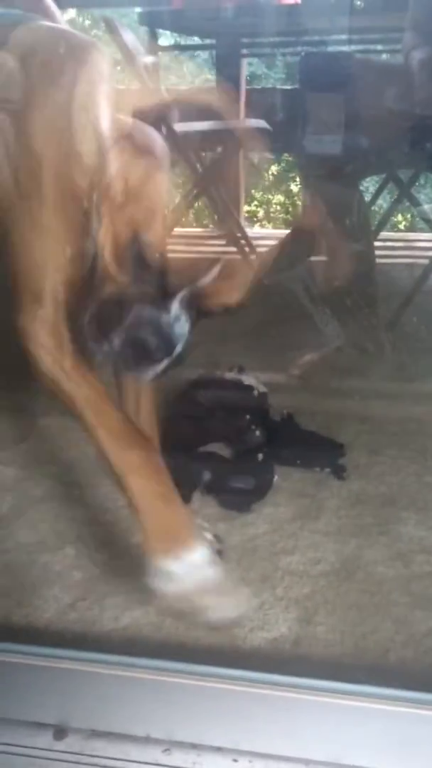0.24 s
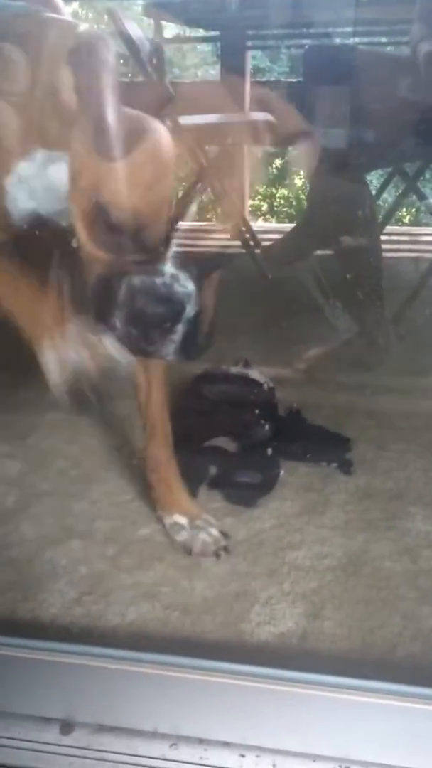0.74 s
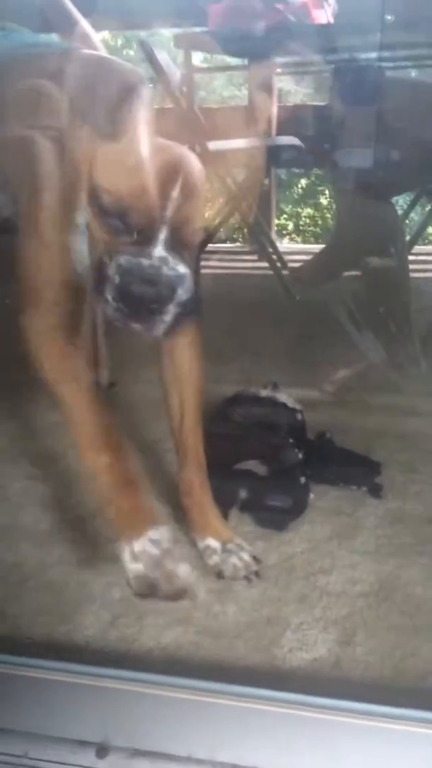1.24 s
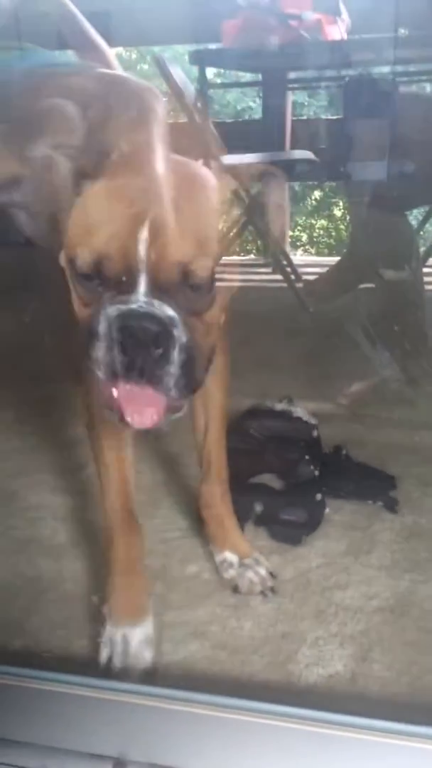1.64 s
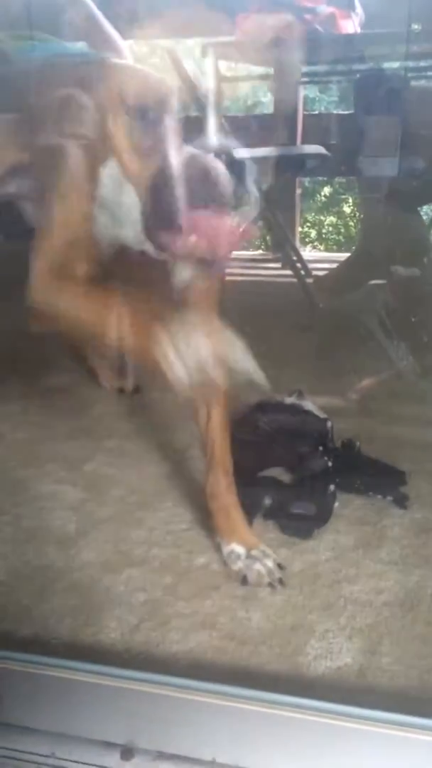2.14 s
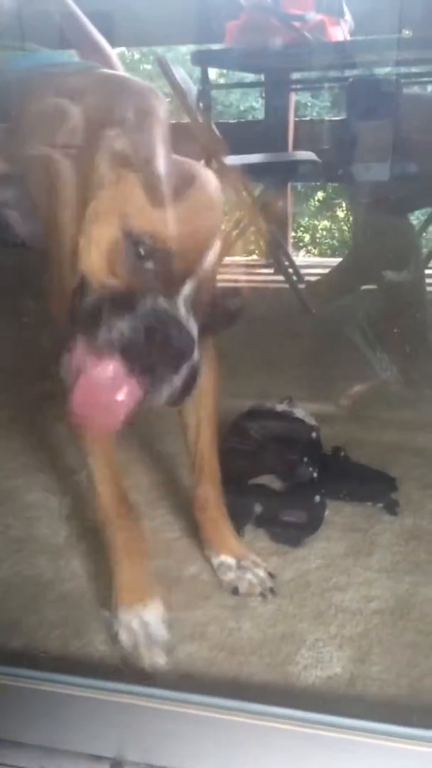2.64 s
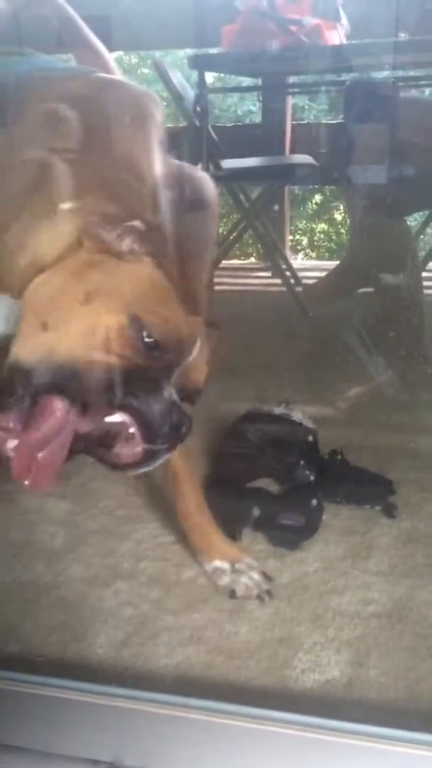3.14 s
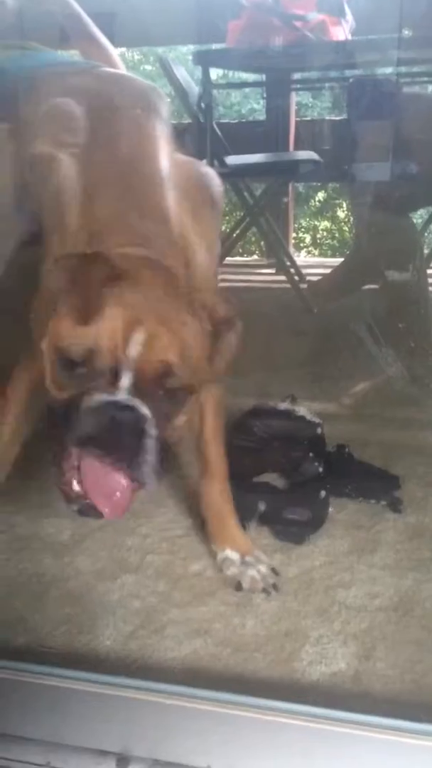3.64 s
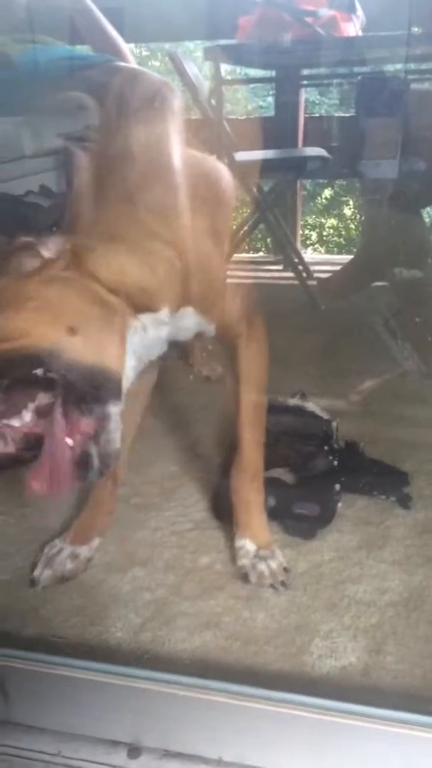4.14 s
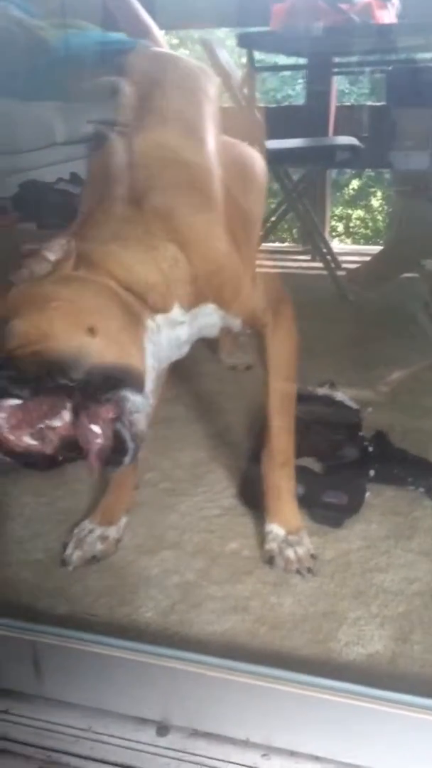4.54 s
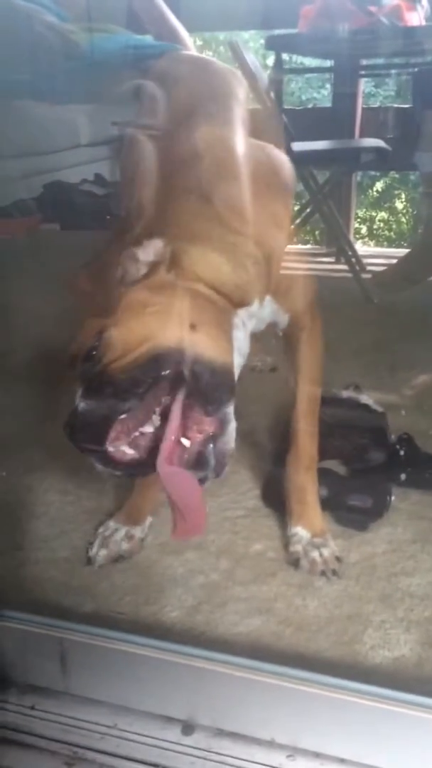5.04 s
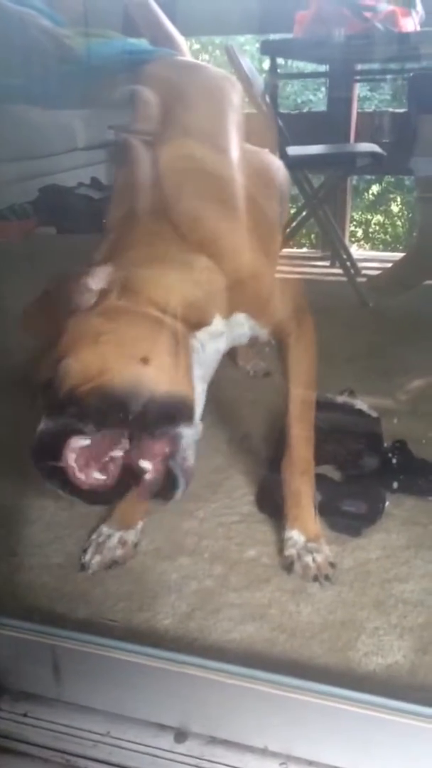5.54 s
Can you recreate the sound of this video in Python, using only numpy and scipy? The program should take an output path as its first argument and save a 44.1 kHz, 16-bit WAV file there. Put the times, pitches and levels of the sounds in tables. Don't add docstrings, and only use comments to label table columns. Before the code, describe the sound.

Heard close through a glass door, a dog's claws and teeth make scattered bright clicks and scrapy ticks, each answered by a brief glassy ring. Sharper cracks cluster around one and a half, two and two and a half seconds. Later, muzzle bumps dominate, giving low hollow thuds, the loudest near four and a half and five and a half seconds. A steady low ventilation rumble with faint hiss lies beneath, with a very short room tail.

```python
import sys
import numpy as np
from scipy import signal
from scipy.fft import rfft, irfft
from scipy.io import wavfile

SR = 44100
rng = np.random.default_rng(int(sys.argv[2]) if len(sys.argv) > 2 else 0)


def volts_from_db(level):
    exponent = np.asarray(level, float) / 20
    return 10 ** exponent


def dump(signal):
    limited = np.clip(np.atleast_2d(signal).T, -1, 1)
    pcm = np.round(limited * 32767).astype(np.int16)
    wavfile.write(sys.argv[1], SR, pcm)


N = 255769

# f/Hz, density/dB per Hz
AIR_COLOUR = [(12, -57), (20, -27.5), (32, -14), (70, -2), (193, -0.5), (255, -14.5), (285, -7.5),
              (377, -12.5), (641, -25.5), (872, -20.5), (1000, -26.5), (1150, -24.5), (7100, -47.5),
              (14700, -49.5), (16000, -78)]
# f/Hz, width/Hz, boost/dB
DUCT_PEAKS = [(208.2, 29, 5.5), (288, 12, 5.5), (645, 104, 14), (994, 37, 8.5), (6390, 2900, 8),
              (8440, 3100, 4)]
# f/Hz, level/dB, t60/s
DOOR_MODES = [(60, -28, 0.08), (101, -19, 0.39), (134.5, -32.5, 0.9), (219.4, -11, 0.19), (277.7, 2, 0.17),
              (340.5, -9.5, 0.28), (427, -9.5, 0.39), (481, -18, 0.35), (560, -11.5, 0.11),
              (632, -9.5, 0.13), (700.4, -3, 0.11), (806, -9.5, 0.095), (850, -25, 0.057), (952, -7, 0.046)]
# f/Hz, width/Hz, boost/dB
PANE_MODES = [(718, 69, -0.5), (890, 150, -17), (1430, 55, -15.5), (1700, 190, -10), (2050, 37, -2),
              (2200, 30, -7), (2435, 53, -5.5), (2440, 260, -7.5), (2970, 4.4, -11), (3900, 55, 1),
              (6300, 200, -40)]
# t/s, push/dB, ringing/dB, hardness/dB per octave above 350 Hz, struck spot f/Hz
BUMPS = [(0.087, -36.5, -26, -36, 205), (1.0221, -39.5, -2.5, -24, 290), (1.5158, -25.5, -27, 11, 444),
         (2.48, -36.5, -17, 4, 435), (2.697, -48, -10, 0, 200), (3.0665, -24.5, -15.5, -5.5, 298),
         (3.1584, -26, -12.5, -24, 286), (4.2562, -30, -9.5, -24, 296), (4.338, -30.5, -6, -23, 297),
         (4.4316, -12.5, -10.5, -1.5, 308.6), (4.6705, -37, -12.5, 2.5, 285), (5.2943, -24, -13, -24, 288),
         (5.4563, -13, -11.5, -2.5, 288), (5.507, -35.5, -2.5, -32, 440), (5.6512, -25.5, -16.5, -25, 288)]
# t/s, direct tick/dB, pane answer/dB, dullness/dB, struck spot f/Hz
STRIKES = [
    (-0.006, -70, -48, 3.5, 2714),
    (1.0169, -39, -29, 2.5, 920),
    (1.226, -41.5, -51.5, 0.5, 4000),
    (1.515, -25.5, -28.5, 0, 2945),
    (2.036, -22.5, -24, 5.5, 890),
    (2.0468, -26.5, -28.5, 10.5, 2377),
    (2.4787, -37, -38, 3.5, 1485),
    (3.0655, -39.5, -53, 5, 2435),
]
# t/s, direct tick/dB, pane answer/dB, dullness/dB, spot f/Hz
PINGS = [(0.2122, -34.5, -49.5, 4, 2230), (0.2915, -40, -35.5, -1, 2167), (0.5649, -31, -43, 0.3, 3900),
         (0.8821, -39, -48, 3, 2515), (1.345, -44.5, -52, 7.5, 1880), (1.5258, -11.5, -27, 2.5, 5220),
         (1.5472, -18, -37, -18, 6100), (2.246, -35, -41.5, 7, 1940), (2.4998, -15.5, -29, -9.5, 2560),
         (2.6033, -54, -59.5, -12, 2280), (5.5077, -64, -57.5, 13, 1590)]
# t/s, direct tick/dB, pane answer/dB, dullness/dB
GRAZES = [(0.0734, -58, -61.5, -5), (0.3184, -43, -50.5, 7), (0.4433, -58, -54, 11),
          (0.536, -47.5, -53.5, 6.5), (1.1415, -61, -56.5, 2), (1.157, -63, -62, -1.5),
          (2.2682, -45, -48, -3.5), (3.257, -53, -59.5, 19), (3.2837, -64, -54, 12),
          (4.392, -62, -47.5, 13), (4.429, -37.5, -45, 11.5)]
# t/s, direct tick/dB, pane answer/dB, dullness/dB
FLICKS = [(0.4818, -56, -67.5, -0.5), (0.7132, -62, -65.5, -0.5), (1.5225, -28, -54.5, 0.5),
          (2.1034, -47, -74, -8), (2.1065, -49.5, -69, -3.5), (2.3999, -57, -61.5, 1),
          (2.4915, -37.3, -63, 2), (3.1543, -53, -62, 4), (4.2515, -57, -80, -8), (4.9427, -67, -64.5, 2),
          (5.2925, -48.5, -70.5, 9), (5.4542, -49, -55, 10.5)]
# f/Hz, level/dB
DRAG_BANDS = [(1254, -43), (2150, -41.5), (2690, -45), (4020, -50), (5500, -56)]
DRAG_S, DRAG_LAG_S = 4.389, .008

RUMBLE_DB, HISS_DB = -51, -65.5
SHUDDER_DB, SHUDDER_T60_S = -29.5, 1.17
ROOM_T60_S, ROOM_DB = 0.16, -14
PUSH_MS, PUSH_MS_PER_DB, PUSH_MS_PER_HARD = 0.57, 0.01, -0.01
STRIKE_BODY_DB, PING_BODY_DB, GRAZE_BODY_DB, FLICK_BODY_DB, BODY_GROWS = 20, 21.5, 16.5, 0, 0.29
STRIKE_SPREAD_MS, PING_SPREAD_MS, GRAZE_SPREAD_MS, FLICK_SPREAD_MS = 7.6, 8, 9.7, 7.3
PANE_SPOT_DB, PANE_SPOT_DB_PER_OCTAVE, PANE_OVERTONE, PANE_OVERTONE_DB = -5, 2.5, 1.6, -8
OVERTONE_LOSS_DB = 23
PING_RING_DB = 4
DOOR_SPOT_DB, DOOR_OVERTONE, DOOR_OVERTONE_DB, DOOR_SPOT_LAG_S = -14.5, 1.47, -5, 0.00401
SPOT_T60_S, SPOT_T60_POWER, SPOT_RISE_MS, SPOT_RISE_POWER = 0.084, -0.41, 3.7, -0.63


def at_hz(points, hz):
    table_hz, values = np.transpose(points)
    return np.interp(np.log(hz + 1), np.log(table_hz), values)


def humps_db(peaks, hz):
    return sum(db / (1 + (2 * (hz - centre_hz) / width) ** 2) for centre_hz, width, db in peaks)


def rms_one(x):
    return x / np.sqrt(np.mean(x ** 2) + 1e-20)


def add(out, s, x):
    at = round(s * SR)
    x = x[max(-at, 0):N - at]
    out[max(at, 0):max(at, 0) + len(x)] += x


def drift(rate_hz):
    r = np.exp(-2 * np.pi * rate_hz * 40 / SR)
    slow = signal.lfilter([1], [1, -2 * r, r * r], rng.standard_normal(N // 40 + 2002))[2000:]
    return np.interp(np.arange(N) / 40, np.arange(len(slow)), rms_one(slow))


def shudder():
    t = np.arange(N) / SR
    power = np.zeros(N)
    for s, push_db, *_ in BUMPS:
        power += volts_from_db(push_db + SHUDDER_DB - 60 * np.abs(t - s) / SHUDDER_T60_S) ** 2 * (t > s)
    return power


def air():
    hz = np.arange(N // 2 + 1) * SR / N
    colour = volts_from_db(at_hz(AIR_COLOUR, hz) + humps_db(DUCT_PEAKS, hz))
    noise = irfft(rfft(rng.standard_normal((2, N))) * colour, N)
    rumble, hiss = np.zeros(N), np.zeros(N)
    edges = 16 * 2 ** np.arange(0, 10.4, .5)
    for k, (low_hz, high_hz) in enumerate(zip(edges, edges[1:])):
        band_pass = signal.butter(2, [low_hz, high_hz], "band", fs=SR, output="sos")
        band = volts_from_db(drift(11.5)) * signal.sosfilt(band_pass, noise[k % 2])
        if high_hz < 1200:
            rumble += band
        else:
            hiss += band
    rumble_level = np.sqrt(volts_from_db(RUMBLE_DB) ** 2 + shudder())
    return rumble_level * rms_one(rumble) + volts_from_db(HISS_DB) * rms_one(hiss)


def room(x):
    t = np.arange(SR // 2) / SR
    tail = rng.standard_normal(len(t)) * volts_from_db(-60 * t / ROOM_T60_S) * (t > .006)
    tail = signal.lfilter([1], [1, -.4], tail)
    return signal.fftconvolve(x, tail / np.sqrt(np.sum(tail ** 2)))[:N]


def bumps():
    out, t = np.zeros(N), np.arange(SR // 2) / SR
    scatter = rng.standard_normal((len(BUMPS), 2, len(DOOR_MODES)))
    hz, level_db, t60 = np.transpose(DOOR_MODES)[:, :, None]
    for (s, push_db, ring_db, hard_db, _), (strength, phase) in zip(BUMPS, scatter[..., None]):
        push_ms = PUSH_MS + PUSH_MS_PER_DB * (push_db + 25) + PUSH_MS_PER_HARD * hard_db
        u = (t[:900] * 1000 - 10) / push_ms
        lean = u / 3.34 + 0.52
        push = .68 * np.exp(-lean ** 2 / 2) - 1.17 * np.exp(-u ** 2 / 2)
        struck_db = level_db + 1.5 * strength + hard_db * np.maximum(np.log2(hz / 350), 0)
        modes = volts_from_db(struck_db - 60 * t / t60) * np.sin(2 * np.pi * hz * t + 2 * phase)
        rings = np.sum(modes, axis=0)
        rings = rings * (1 - np.exp(-(t / 0.0055) ** 2))
        add(out, s, volts_from_db(push_db + ring_db) * rings)
        add(out, s - .01, volts_from_db(push_db) * push)
    return out


def touches():
    kinds = [(STRIKES, STRIKE_BODY_DB, BODY_GROWS, STRIKE_SPREAD_MS),
             (PINGS, PING_BODY_DB, BODY_GROWS, PING_SPREAD_MS),
             (GRAZES, GRAZE_BODY_DB, 0, GRAZE_SPREAD_MS),
             (FLICKS, FLICK_BODY_DB, 0, FLICK_SPREAD_MS)]
    rows = []
    for table, body_db, grows, spread_ms in kinds:
        for s, tick_db, pane_db, dull_db, *_ in table:
            ends_db = pane_db - body_db - grows * (pane_db + 38)
            rows.append((s, tick_db, ends_db + dull_db, pane_db, ends_db - dull_db, spread_ms))
    return rows


def struck_spots():
    rows = [(DRAG_S + DRAG_LAG_S * 1000 / hz, hz, db) for hz, db in DRAG_BANDS]
    for k, (blow, touch) in enumerate(zip(STRIKES + PINGS, touches())):
        spot_hz = blow[-1]
        s, _, low_db, mid_db, high_db, _ = touch
        overtone_db = PANE_OVERTONE_DB - OVERTONE_LOSS_DB * (spot_hz / 5000) ** 4
        for hz, db in (spot_hz, 0), (spot_hz * PANE_OVERTONE, overtone_db):
            blow_db = at_hz([(900, low_db + 20.5), (3000, mid_db - 1.5), (8000, high_db + 13.5)], hz)
            blow_db += PING_RING_DB * (k >= len(STRIKES))
            tilt_db = PANE_SPOT_DB_PER_OCTAVE * np.log2(hz / 2500)
            rows.append((s + .001, hz, blow_db + db + PANE_SPOT_DB + tilt_db))
    for s, push_db, _, hard_db, spot_hz in BUMPS:
        late_s, spot_db = s + DOOR_SPOT_LAG_S, push_db + DOOR_SPOT_DB
        rows.append((late_s, spot_hz, spot_db))
        rows.append((late_s, spot_hz * DOOR_OVERTONE, spot_db + DOOR_OVERTONE_DB + min(hard_db, 0)))
    return rows


def spots():
    out, t = np.zeros(N), np.arange(SR // 4) / SR
    rows = struck_spots()
    for (s, hz, level_db), chance in zip(rows, rng.random((len(rows), 3, 1))):
        t60 = SPOT_T60_S * (hz / 1000) ** SPOT_T60_POWER
        rise_ms = SPOT_RISE_MS * (hz / 1000) ** SPOT_RISE_POWER
        spacing = 0.0274 + 0.042 * (hz > 1500)
        cluster_hz = hz * (1 + spacing * (np.arange(-1, 2)[:, None] + chance - .5))
        modes = np.sin(2 * np.pi * (cluster_hz * t + chance)) * [[.7], [1], [.7]]
        envelope = volts_from_db(level_db - 60 * t / t60) * (1 - np.exp(-t * 1000 / rise_ms))
        add(out, s, np.sum(modes, axis=0) * envelope)
    return out


def pane_answer(noise, spread_ms, die_ratio=1.85, ref_hz=2500, speed_power=.42):
    size = 16384
    fine_size = 16 * size
    hz = np.arange(size // 2 + 1) * SR / size
    path = np.arange(len(noise)) / SR * 1000 / spread_ms
    paths = noise * (1 - np.exp(-(path * 2.0) ** 1.4)) * np.exp(-path / die_ratio)
    wide = rfft(paths / np.sqrt(np.sum(paths ** 2) / SR * 100), fine_size)
    warped_hz = ref_hz * (hz / ref_hz) ** speed_power / speed_power
    bins, known = warped_hz * fine_size / SR, np.arange(len(wide))
    return hz, np.interp(bins, known, wide.real) + 1j * np.interp(bins, known, wide.imag)


def pane_modes(hz, chances):
    gain = 1
    for (mode_hz, width, db), chance in zip(PANE_MODES, chances):
        gain = gain + volts_from_db(db + 2 * chance) / (1 + 2j * (hz - mode_hz) / width)
    return gain


def air_crack(noise):
    ms = np.arange(400) / SR * 1000
    bright = np.vstack([signal.butter(1, [3600, 7500], "band", fs=SR, output="sos"),
                        signal.butter(2, 3300, "high", fs=SR, output="sos")])
    scrape = noise[-400:] * (.8 * np.exp(-ms / 0.7) + 0.12 * np.exp(-ms / 2))
    crack = signal.sosfilt(bright, 2.6 * (ms == 0) + scrape)
    crack = crack + 0.6 * signal.lfilter(*signal.iirpeak(5700, 3.0, fs=SR), crack)
    return crack / np.max(np.abs(crack))


def ticks():
    out, rows = np.zeros(N), touches()
    noises = rng.standard_normal((len(rows), 8192))
    for (s, tick_db, low_db, mid_db, high_db, spread_ms), noise in zip(rows, noises):
        hz, answer = pane_answer(noise, spread_ms)
        colour_db = at_hz([(150, low_db + 15.5), (900, low_db + 18), (3000, mid_db + 3.0),
                           (4600, (mid_db + high_db) / 2 + 8), (8000, high_db + 7.5),
                           (16000, high_db - 1)], hz)
        lead = np.exp(-2j * np.pi * hz * .002)
        spectrum = answer * pane_modes(hz, noise) * volts_from_db(colour_db) * lead
        add(out, s - .002, irfft(spectrum))
        add(out, s - .0002, volts_from_db(tick_db) * air_crack(noise))
    return out


def scene():
    no_deep_bass = signal.butter(2, 75, "high", fs=SR, output="sos")
    door = ticks() + spots() + signal.sosfilt(no_deep_bass, bumps())
    door = door - 0.15 * signal.lfilter(*signal.iirpeak(7900, 5.0, fs=SR), door)
    return (door + volts_from_db(ROOM_DB) * room(door) + air())[None]


def low_pass(x):
    return signal.sosfilt(signal.butter(12, 16130, fs=SR, output="sos"), x)


def record(dry):
    cut = signal.sosfilt(signal.cheby2(12, 60, 16300, fs=SR, output="sos"), dry)
    return low_pass(cut)


dry = scene()
out = record(dry)
dump(out)
```